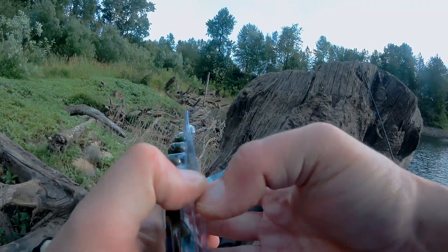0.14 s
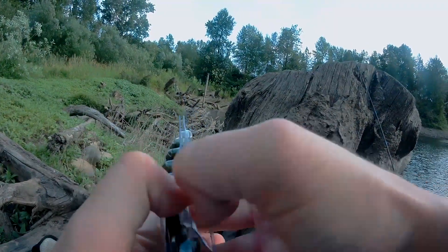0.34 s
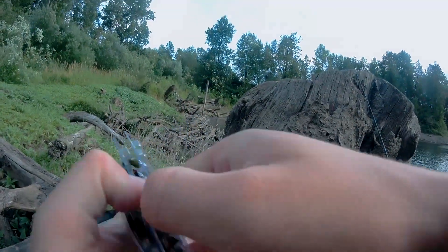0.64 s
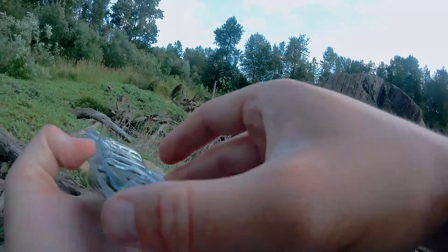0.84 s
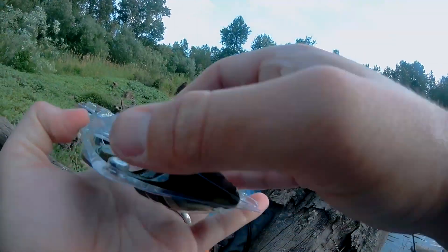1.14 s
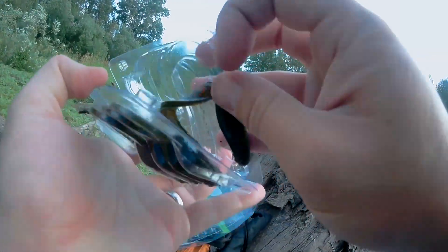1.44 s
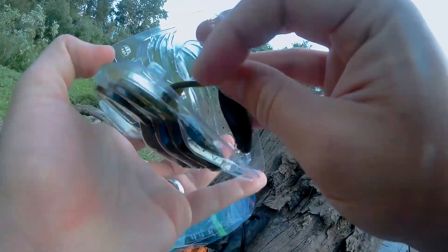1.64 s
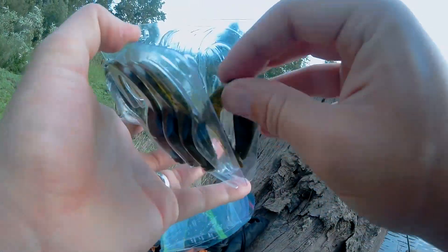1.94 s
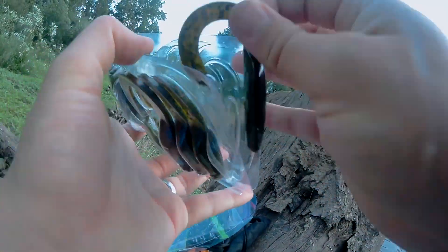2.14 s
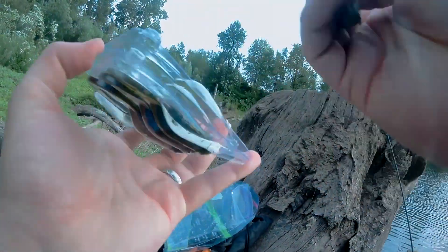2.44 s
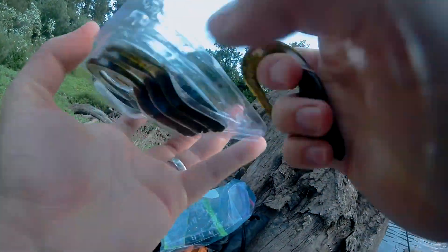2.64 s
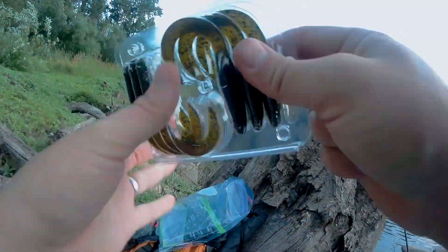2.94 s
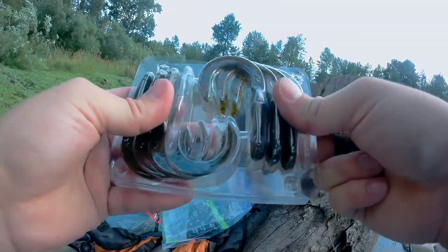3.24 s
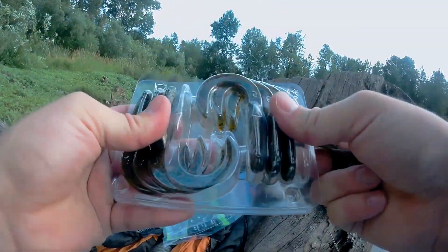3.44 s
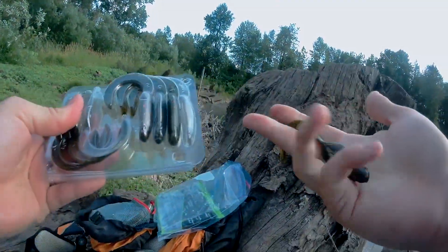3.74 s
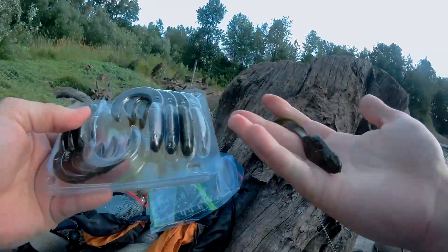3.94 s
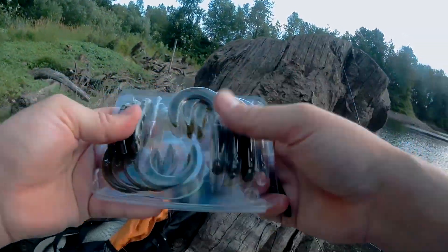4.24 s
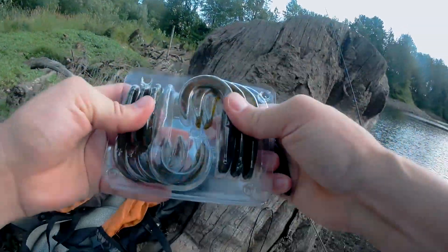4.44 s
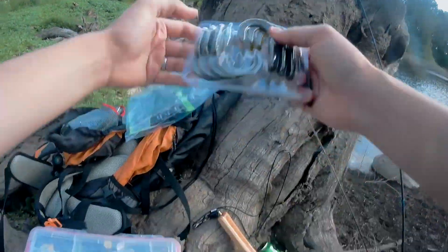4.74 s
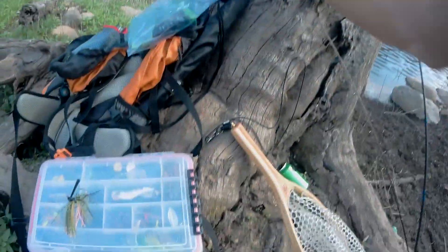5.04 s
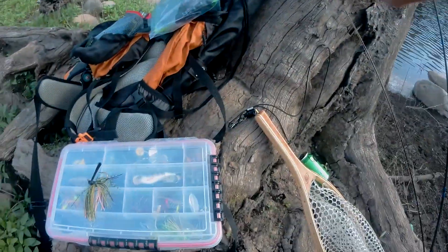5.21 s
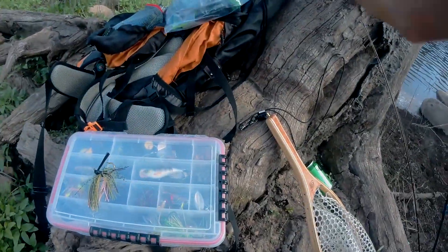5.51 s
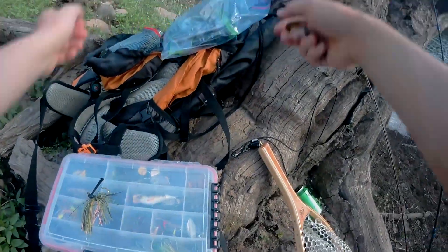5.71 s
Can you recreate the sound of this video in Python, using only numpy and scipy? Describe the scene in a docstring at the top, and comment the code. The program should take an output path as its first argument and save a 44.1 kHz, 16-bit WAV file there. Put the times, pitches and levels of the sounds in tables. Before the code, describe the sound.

A very quiet, steady lakeside breeze and faint low wind on the microphone lie under close, dry plastic handling. Light finger scuffs and ticks begin at once, then two bright, hard stud pops at about 0.32 and 0.38 s are the sharpest sounds. Sparse small clicks and rubs continue, with a weaker double pop near 1.27 s. A short, hollow, grainy rasp at 2.0-2.14 s is the soft lure dragged from its pocket. Clicks cluster near 2.7 s, and a strong double snap at 2.96 s closes the lid, followed by quick creaking ticks at 3.13-3.18 s. Separate crisp clicks come at 3.5, 3.77 and 4.14 s, with another slowing creak at 4.23-4.3 s. After a lull, light ticks from 4.93 s lead to the tossed pack landing on the backpack around 5.2-5.32 s, a dense, dull clatter and scuff, fading to breeze and a last tiny tick.

```python
"""Fingers scuff and click a thin clear plastic clamshell of fishing lures, close by, over a light breeze at a lake.
Its press studs pop, a soft lure rasps out, the lid creaks shut and the pack is tossed onto a backpack.
Jolts (slip, flutter, rib ring, ground scatter) and showers of tiny slips drive a resonant shell filter;
breeze and wind are coloured noise with gusts."""
import sys
import numpy as np
from scipy import signal
from scipy.fft import rfft, irfft
from scipy.io import wavfile
from scipy.ndimage import uniform_filter1d

SR = 44100
rng = np.random.default_rng(int(sys.argv[2]) if len(sys.argv) > 2 else 0)


def file_out(sig):
    """Save sig as 16-bit WAV at sys.argv[1]."""
    # one column per channel
    cols = np.atleast_2d(sig).T
    # limit, then scale
    lim = np.clip(cols, -1, 1)
    pcm = np.round(lim * 32767).astype(np.int16)
    wavfile.write(sys.argv[1], SR, pcm)


N = 258955
TAPS = 4096
HZ = np.fft.rfftfreq(TAPS, 1 / SR)
# edges of the thud, clack and tick bands: edge_hz
BAND_EDGES_HZ = [150, 1300, 3500, 11500]


def gain_of(db):
    """Decibels to amplitude."""
    return 10 ** (np.asarray(db) / 20)


def evened(x):
    """Scales to rms 1."""
    return x / np.sqrt(np.mean(x ** 2) + 1e-20)


def unit(x):
    """Scales to energy 1."""
    return x / np.sqrt(np.sum(x ** 2) + 1e-20)


def read(points, hz):
    """Interpolates (Hz, value) points on a log-frequency axis."""
    f, value = np.transpose(points)
    return np.interp(np.log(hz + 1), np.log(f + 1), value)


def add(mix, start_s, sound):
    """Mixes a sound in, in place, at start_s."""
    part = mix[max(round(start_s * SR), 0):][:len(sound)]
    part += sound[:len(part)]


def drift(rate_hz):
    """Slow random motion of rms 1: noise low-passed near rate_hz."""
    hz = np.fft.rfftfreq(N, 1 / SR)
    lowpass = 1 / (1 + (hz / rate_hz) ** 2)
    return evened(irfft(rfft(rng.standard_normal(N)) * lowpass, N))


def colour(x, gain):
    """Causal (minimum-phase) filter with the given gain at HZ."""
    both_sides = np.r_[gain, gain[-2:0:-1]]
    log_gain = np.log(np.maximum(both_sides, 1e-6))
    taps = np.fft.ifft(np.exp(np.conj(signal.hilbert(log_gain)))).real
    return signal.fftconvolve(x, taps[:TAPS // 2])


def breeze(spectrum, level_db, gust_db, gust_hz):
    """Moving air: coloured noise that swells with the gusts."""
    gain = gain_of(read(spectrum, np.fft.rfftfreq(N, 1 / SR)))
    noise = irfft(rfft(rng.standard_normal(N)) * gain, N)
    gusts = gain_of(gust_db * drift(gust_hz))
    level = np.interp(np.arange(N) / SR, *np.transpose(level_db))
    return evened(noise * gusts) * gain_of(level)


def distant_air():
    """Breeze in the trees and on the water: broad noise with slight gusts."""
    # relative spectrum: freq_hz, density_db_per_hz
    air_spectrum = [(59, -36), (100, 1), (172, -4.5), (295, -11.5), (500, -10.5), (750, -11.5), (1500, -15),
                    (2500, -16.5), (5200, -22.5), (6800, -28.5), (8200, -25), (9500, -32), (10300, -54)]
    # rms level: time_s, level_db
    air_level = [(0, -58), (1.6, -59), (2.45, -59.5), (3.9, -60), (5.2, -58), (5.85, -61)]
    return breeze(air_spectrum, air_level, gust_db=0.19, gust_hz=9.3)


def microphone_wind():
    """Wind on the microphone: low-frequency noise with stronger gusts."""
    # relative spectrum: freq_hz, density_db_per_hz
    wind_spectrum = [(12, -21), (28, -10.5), (43, 3.5), (58, -6), (80, -4), (120, -19), (200, -29.5),
                     (500, -48), (2000, -87)]
    # rms level: time_s, level_db
    wind_level = [(0, -62), (1.7, -61), (2.1, -56), (2.6, -58), (4.4, -58.5), (5.0, -55.5), (5.85, -59)]
    return breeze(wind_spectrum, wind_level, gust_db=1.0, gust_hz=14)


def shell(x, walls_hz, levels_db, edges, seconds, wall_db, wall_q=6.8, grip=0.017, spread=.3, top_hz=10600):
    """Passes a force through the shell; the place of contact sets each band's level, as rms over the given seconds."""
    # broad, heavily damped resonances of the hand-held shell: freq_hz, width_hz, relative_db
    shell_modes = [(191, 110, -22), (362, 67, -8.5), (567, 340, -10.5), (810, 100, -2), (1193, 210, -4),
                   (1730, 370, 0), (1990, 220, -3), (2510, 420, 3), (2975, 350, -4.5), (3340, 1250, -9.5),
                   (3780, 750, -7.5), (5500, 1800, -9), (7520, 1300, -7.5), (8000, 470, -17),
                   (9440, 510, -8)]
    shifts = np.exp(grip * rng.standard_normal(len(shell_modes)))  # the grip retunes the resonances
    modes = np.array([gain_of(db) / (1 + 2j * (HZ - f * shift) / width)
                      for (f, width, db), shift in zip(shell_modes, shifts)])
    # at a point contact neighbouring modes cancel between their peaks; a wide one fills the gaps
    point_power = abs(modes.sum(0)) ** 2
    wide_power = np.sum(abs(modes) ** 2, axis=0)
    power = (1 - spread) * point_power + spread * wide_power
    for hz in walls_hz:  # the touched patch of wall adds its own resonance
        power = power * (1 + gain_of(wall_db) ** 2 / (1 + (2 * wall_q * (HZ / hz - 1)) ** 2))
    treble_cut = 1 / np.sqrt(1 + (HZ / top_hz) ** 24)
    bass_cut = HZ ** 2 / (HZ ** 2 + 130 ** 2)
    gain = np.sqrt(power) * treble_cut * bass_cut
    centres = np.sqrt(np.multiply(edges[:-1], edges[1:]))
    for _ in range(3):  # steer the band levels to levels_db
        y = colour(x, gain)
        energy = np.cumsum(abs(rfft(y)) ** 2) * 2 / len(y)
        band_energy = np.diff(np.interp(edges, np.fft.rfftfreq(len(y), 1 / SR), energy))
        rms = np.sqrt(band_energy / (seconds * SR))
        log_step = np.log(gain_of(levels_db) / rms)
        gain = gain * np.exp(read(np.c_[centres, log_step], HZ))
    return colour(x, gain)


def jolt(t60, rattle_db, ring_db, ground_db, ground_t60=0.22, bend_s=0.000381, slip_hz=4500):
    """A sudden slip, the flutter of bending waves after it, the ring of the ribs and faint scatter from the ground."""
    # light ring of the stiff ribs, equal in strength: freq_hz
    ring_hz = [1650, 2340, 2910, 3770, 4230, 5140, 5790, 6985, 7720, 9450]
    ring_t60 = .04
    t = np.arange(TAPS) / SR
    ground_decay = gain_of(-60 * t / ground_t60)
    late = np.exp(-4j * np.pi * bend_s * np.sqrt(HZ * 10 ** 3))  # low bending waves lag: bend_s at 1 kHz
    slip = irfft(late / (1 + 1j * HZ / slip_hz)) * ground_decay  # a slip takes time, which dulls it
    flutter = unit(rng.standard_normal(TAPS) * gain_of(-60 * t / t60))
    tones = sum(np.sin(2 * np.pi * (f * t + rng.random())) for f in ring_hz)
    ring = unit(tones * gain_of(-60 * t / ring_t60))
    ground = unit(rng.standard_normal(TAPS) * ground_decay * (1 - np.exp(-t / 0.0034)))
    rattle = flutter + gain_of(ring_db) * ring
    return slip + gain_of(rattle_db) * rattle + gain_of(ground_db) * ground


def stroke(start, peak, end, slips_per_s=1700, spread_db=2.5, smooth=0.14, catch_db=2.0, catch_s=.004):
    """A shower of tiny slips that swells and fades, in clumps as the surface catches; gives force, effective length."""
    t = np.arange(start, max(end, start + .01), 1 / SR)
    pressure = np.interp(t, [start, peak, end], [0, 1, 0])
    sizes = gain_of(spread_db * np.minimum(rng.exponential(1, len(t)), 3))
    happens = rng.random(len(t)) < slips_per_s / SR
    slips = happens * sizes * rng.choice([-1, 1], len(t))
    catching = evened(uniform_filter1d(rng.standard_normal(len(t)), max(int(catch_s * SR), 1)))
    clumps = gain_of(catch_db * np.clip(catching, -2, 2))
    force = pressure * clumps * (slips + smooth * rng.standard_normal(len(t)))
    return force, np.sum(pressure ** 2) / SR


def band_levels(colours, wall_hz, level_db):
    """Thud, clack and tick levels: broad soft panels thud and small stiff corners tick."""
    hz, thud_db, tick_db = np.transpose(colours)
    thud = read(np.c_[hz, thud_db], wall_hz)
    tick = read(np.c_[hz, tick_db], wall_hz)
    return level_db + np.array([thud, 0, tick])


def dent(wall_hz, rattle_db, levels_db):
    """One small dent flips in the thin wall, damped at once by the fingers."""
    force = jolt(0.02, rattle_db, ring_db=-18.5, ground_db=-28)
    return shell(force, [wall_hz], levels_db, BAND_EDGES_HZ, .01, wall_db=6, wall_q=3.5, grip=.03, spread=.9)


def rubs():
    """Skin or cloth slides on the shell, at the end on the backpack: soft, grainy scuffs."""
    # strongest_s, length_s, wall_hz, level_db
    rub_events = [(0.042, 0.078, 2200, -61), (0.108, 0.07, 3870, -58.5), (0.295, 0.12, 1980, -55.5),
                  (0.36, 0.05, 2070, -54.5), (0.419, 0.14, 1820, -60.5), (0.594, 0.056, 1830, -58.5),
                  (0.681, 0.11, 3650, -64), (1.021, 0.057, 3260, -57.5), (1.359, 0.11, 1140, -57),
                  (2.211, 0.084, 2760, -56.5), (2.711, 0.097, 2980, -59.5), (2.859, 0.26, 2650, -55.5),
                  (3.115, 0.11, 2580, -54.5), (3.456, 0.082, 2470, -54.5), (4.223, 0.08, 2200, -52),
                  (5.029, 0.32, 980, -58.5), (5.249, 0.125, 2000, -46), (5.298, 0.052, 1020, -37),
                  (5.322, 0.045, 900, -42), (5.42, 0.16, 656, -57)]
    # levels against the event's: wall_hz, thud_db, tick_db
    rub_colours = [(700, 2, -1.5), (1000, 1.5, -6), (1950, -1, -3.5), (2600, -5.5, -8), (3930, -2.5, 9)]
    rise_share = 0.4  # of a rub, spent swelling
    out = np.zeros(N)
    for peak, length, wall_hz, level_db in rub_events:
        start = peak - rise_share * length
        force, seconds = stroke(start, peak, start + length, slips_per_s=1300, catch_db=4.0)
        levels_db = band_levels(rub_colours, wall_hz, level_db)
        sound = shell(force, [wall_hz], levels_db, BAND_EDGES_HZ, seconds, wall_db=5, spread=0.72, top_hz=10140)
        add(out, start, sound)
    return out


def clicks():
    """Single dents and knocks as the pack is turned, pressed and dropped."""
    # start_s, wall_hz, rattle_db (against the first jolt), level_db
    click_events = [(0.1094, 3700, 5, -55), (0.1146, 3740, 15, -47), (0.2438, 7700, -3, -56.5),
                    (0.2657, 2360, 5, -52.5), (0.287, 5690, -19, -58.5), (0.5582, 2880, -3, -50),
                    (0.743, 2800, -7, -51.5), (1.0293, 3000, 2, -51), (1.0924, 6500, 19, -56.5),
                    (1.198, 2800, 2, -47), (1.3411, 1350, 16, -52.5), (2.095, 2460, 7, -49.5),
                    (2.2146, 3340, 4, -57), (2.668, 2520, 6, -53), (2.6959, 3000, 6, -48),
                    (2.7079, 2430, -1, -47.5), (2.724, 3100, 6, -48), (2.7419, 2800, 14, -44.5),
                    (2.9313, 2440, -4, -50.5), (3.0636, 2430, 21, -54), (3.1095, 2550, -23, -44),
                    (3.2715, 2650, -4, -46.5), (3.4588, 3900, -4, -58), (3.469, 2420, 21, -46.5),
                    (3.5103, 2370, -6.5, -38.5), (3.7709, 1560, -6.5, -40), (4.1093, 2940, -7, -52.5),
                    (4.1428, 2560, 23, -40.5), (4.2145, 2160, 8, -50), (4.462, 3730, 9, -58.5),
                    (4.931, 1400, 1, -52.5), (4.9792, 7150, 10, -60.5), (5.059, 1930, -3, -44),
                    (5.081, 3320, 11, -55), (5.1195, 3400, -8, -58.5), (5.155, 2010, 5, -52),
                    (5.2124, 3680, -2, -53.5), (5.2216, 9900, -5, -51.5), (5.2433, 3080, 16.5, -45.5),
                    (5.2471, 2830, 2, -43.5), (5.2928, 1160, 24, -36.5), (5.3027, 1330, 1, -46),
                    (5.318, 2400, 3, -41), (5.464, 1370, 2, -54.5), (5.5808, 7560, 12, -61.5)]
    # levels against the event's: wall_hz, thud_db, tick_db
    click_colours = [(1230, -3.5, -6.5), (1640, -17.5, -10.5), (2800, -9.5, -8.5), (3720, -13, 0.5),
                     (7500, -2.5, 7)]
    out = np.zeros(N)
    for start, wall_hz, rattle_db, level_db in click_events:
        add(out, start, dent(wall_hz, rattle_db, band_levels(click_colours, wall_hz, level_db)))
    return out


def creaks(wall_scatter=0.21, scatter_db=-2.0):
    """The lid slips by equal steps; as the squeeze eases, the ticks come further and further apart."""
    # first_tick_s, last_tick_s, ticks, squeeze_ease_s, wall_hz, level_db
    creak_runs = [(3.1286, 3.184, 5, 0.0285, 2200, -48.5), (4.2277, 4.3071, 6, 0.066, 2110, -51)]
    rattle_db, thud_db, tick_db = -6.5, -8, -13.5
    growth_db = 3  # first tick to last: the longer the lid sticks, the harder it slips
    out = np.zeros(N)
    for first, last, ticks, ease_s, wall_hz, level_db in creak_runs:
        squeeze = np.linspace(1, np.exp((first - last) / ease_s), round(ticks))
        times = first - ease_s * np.log(squeeze)
        for s, (place, size) in zip(times, rng.standard_normal((len(squeeze), 2))):
            growth = growth_db * (s - first) / (last - first)
            levels_db = level_db + growth + scatter_db * size + np.array([thud_db, 0, tick_db])
            add(out, s, dent(wall_hz * np.exp(wall_scatter * place), rattle_db, levels_db))
    return out


def lure(echo=0.49, echo_s=0.00163):
    """The rubbery lure rasps out of its pocket; an echo from the open lid gives the rasp a hollow, banded colour."""
    # start_s, strongest_s, end_s, wall_hz, thud_db, clack_db, tick_db
    drags = [(1.987, 2.089, 2.14, 1140, -55, -53, -57), (2.038, 2.073, 2.115, 1100, -46.5, -47, -56.5)]
    comb = abs(1 + echo * np.exp(-2j * np.pi * HZ * echo_s))
    out = np.zeros(N)
    for start, peak, end, wall_hz, *levels_db in drags:
        force, seconds = stroke(start, peak, end, slips_per_s=2500, catch_db=3.5)
        force = colour(force, comb)
        add(out, start, shell(force, [wall_hz], levels_db, BAND_EDGES_HZ, seconds, wall_db=7.5, spread=.5))
    return out


def snaps():
    """Press studs jump out of their sockets or into them and shake the whole lid."""
    # start_s, t60_s, rattle_db (against the first jolt), tray_hz, wall_hz, then level_db in each of six bands
    snap_events = [(0.3233, 0.016, 2.5, 774, 1690, -40.5, -37.5, -47.5, -31, -33, -38.5),
                   (0.3834, 0.021, 6, 504, 2300, -38, -38, -37.5, -30.5, -29, -34),
                   (1.2705, 0.017, 1.5, 1170, 1730, -45, -52, -46.5, -36.5, -42.5, -54.5),
                   (1.2805, 0.016, 1.5, 633, 2400, -46, -36.5, -46.5, -33, -51, -55.5),
                   (2.9587, 0.0054, -2, 1110, 2400, -53.5, -63, -53, -39.5, -49.5, -55),
                   (2.9632, 0.023, 3, 1070, 2360, -41, -36.5, -33.5, -29.5, -45.5, -38.5)]
    # edges of those bands: edge_hz
    snap_edges_hz = [100, 400, 950, 1400, 3300, 6500, 11500]
    out = np.zeros(N)
    for start, t60, rattle_db, tray_hz, wall_hz, *levels_db in snap_events:
        force = jolt(t60, rattle_db, ring_db=-14, ground_db=-24)
        sound = shell(force, [tray_hz, wall_hz], levels_db, snap_edges_hz, .01, wall_db=8, wall_q=5, spread=.9)
        add(out, start, sound)
    return out


def scene():
    """The distant air, the wind at the microphone and the pack in the hands."""
    background = distant_air() + microphone_wind()
    pack = rubs() + clicks() + creaks() + lure() + snaps()
    return (background + pack)[None]


def record(dry):
    """The recorder's band limit: a linear-phase low-pass."""
    edge_hz = 12300
    taps = signal.firwin(511, edge_hz, window=("kaiser", 8), fs=SR)
    return signal.oaconvolve(dry, taps[None], "same")


dry = scene()
out = record(dry)
file_out(out)
```